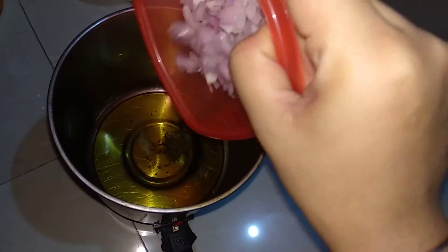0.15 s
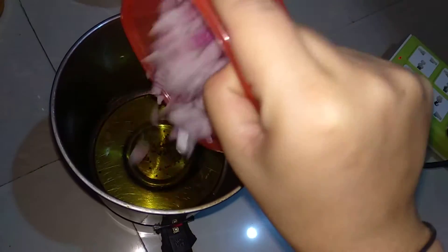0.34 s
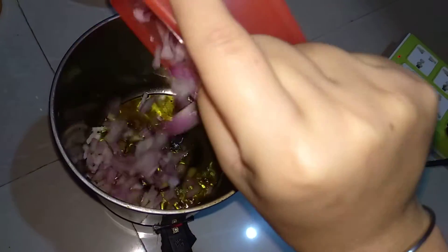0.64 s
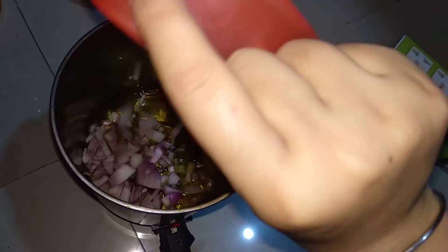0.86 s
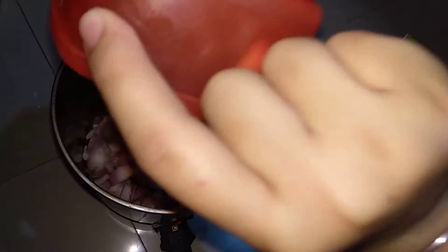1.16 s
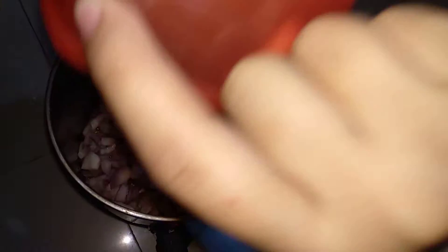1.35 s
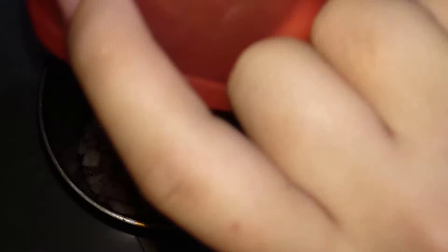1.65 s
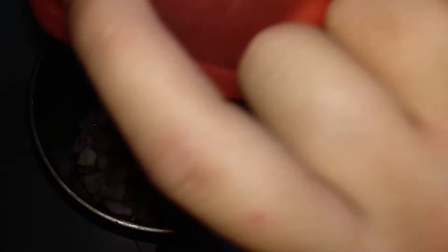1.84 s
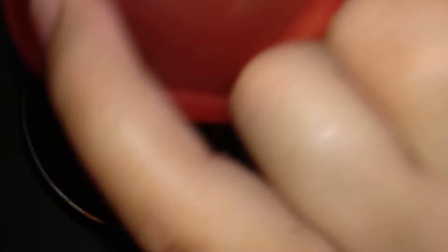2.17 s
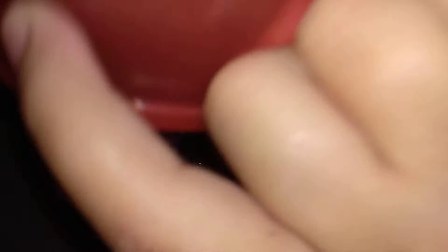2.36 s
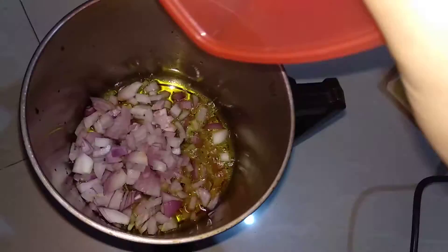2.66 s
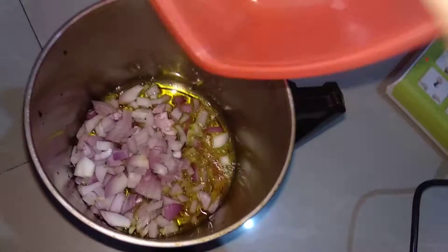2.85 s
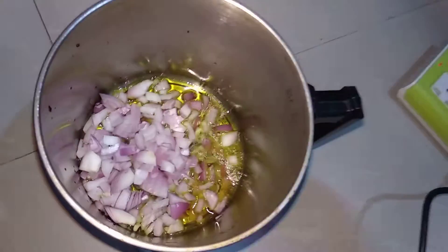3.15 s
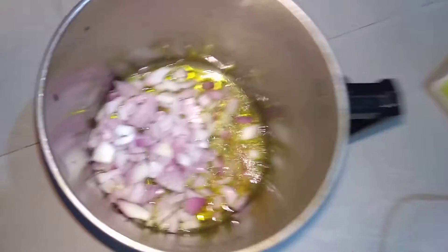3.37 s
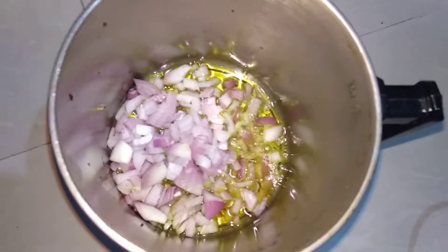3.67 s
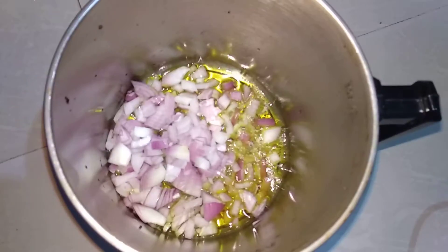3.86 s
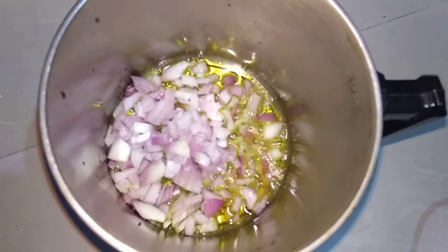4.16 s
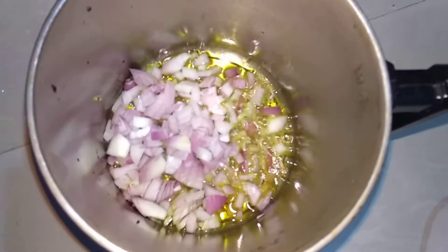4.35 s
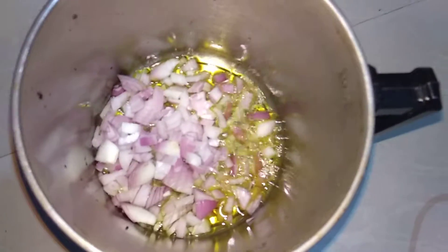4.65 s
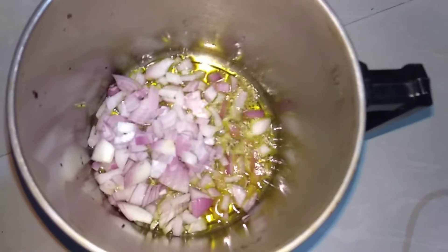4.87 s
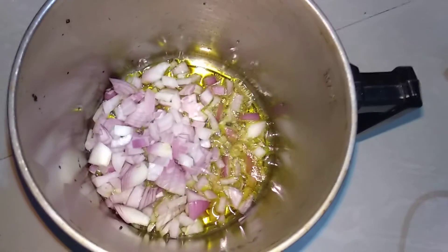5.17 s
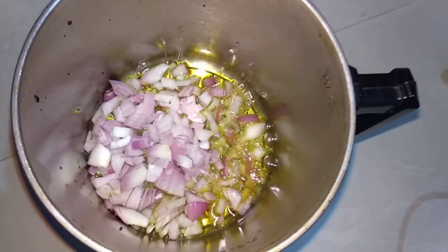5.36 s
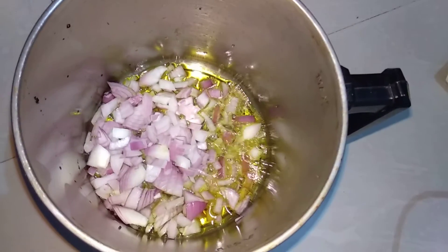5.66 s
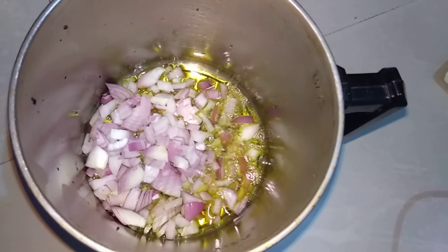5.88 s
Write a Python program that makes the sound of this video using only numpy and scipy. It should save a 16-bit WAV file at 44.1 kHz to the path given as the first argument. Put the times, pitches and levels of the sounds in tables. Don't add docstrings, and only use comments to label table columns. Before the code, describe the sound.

Handheld close-up in a small kitchen: faint rumble and a couple of pops and bowl taps, then chopped onions splash into hot oil with a fierce hiss. The frying eases but continues, crisp and crackly, with slight hollow gurgling from the pot. Scattered pops spit out, a plastic bowl is put down in a double knock, and a piercing snap follows soon after.

```python
import sys
import numpy as np
from scipy import signal
from scipy.fft import rfft, irfft, next_fast_len
from scipy.io import wavfile
from scipy.ndimage import uniform_filter1d, minimum_filter1d, map_coordinates

SR = 44100
rng = np.random.default_rng(int(sys.argv[2]) if len(sys.argv) > 2 else 0)


def int16_out(signal):
    q = np.round(np.clip(np.atleast_2d(signal).T, -1, 1) * 32767)
    wavfile.write(sys.argv[1], SR, q.astype(np.int16))


def nominal_scale(level):
    x = np.asarray(level, float) / 20
    return 10 ** x


N = 265261


def unit(x):
    return x / np.sqrt(np.mean(x ** 2) + 1e-20)


def along(points, hz):
    f, v = np.transpose(points)
    return np.interp(np.log(hz + 1), np.log(f + 1), v)


def curves(rows):
    s, *cols = np.transpose(rows)
    return [np.interp(np.arange(N) / SR, s, c) for c in cols]


def wobble(rate):
    return map_coordinates(rng.standard_normal(N // 256), [np.arange(N) * rate / SR])


def filtered(x, response):
    m = next_fast_len(x.shape[-1] + 8192)
    spectrum = rfft(x, m) * response(np.fft.rfftfreq(m, 1 / SR))
    return irfft(spectrum, m)[..., :x.shape[-1]]


def ears(pan_db):
    return nominal_scale(np.array([pan_db / 2, -pan_db / 2]))


def late(f, seconds):
    return np.exp(-2j * np.pi * f * seconds)


def scatter(t60, size=4096):
    tail = rng.standard_normal((2, size)) * nominal_scale(-60 * np.arange(size) / SR / t60)
    return tail / np.linalg.norm(tail, axis=1)[:, None]


def add(track, sound, s):
    part = track[:, round(s * SR):][:, :sound.shape[1]]
    part += sound[:, :part.shape[1]]


def patchy(x, gain):
    hz, _, z = signal.stft(x, SR, nperseg=1024)
    field = rng.standard_normal(z.shape[1:])
    field = uniform_filter1d(field, 4, 0)
    field = uniform_filter1d(field, 5, 1)
    return signal.istft(z * gain(hz[:, None], unit(field)), SR, nperseg=1024)[1][:, :N]


def hum(hz, wander):
    return np.sqrt(2) * np.sin(2 * np.pi * np.cumsum(hz * (1 + wander * wobble(7))) / SR)


# loudest_s, length_s, firing_hz, level_db
ENGINES = [(0.156, 0.27, 64.8, -56), (1.102, 0.21, 25, -62), (2.245, 0.68, 66.8, -60),
           (3.62, 1.21, 27.17, -54.5), (3.5, 0.57, 45.2, -58), (4.339, 0.19, 70.1, -56),
           (5.153, 0.56, 37.84, -57), (5.905, 0.53, 64, -62), (0.08, 0.22, 164.4, -69),
           (2.0, 0.35, 192, -78), (3.399, 0.22, 108.6, -64), (4.697, 0.59, 112.3, -67.5),
           (5.652, 0.21, 108, -65)]


def engines():
    glide_per_s, octave_db, octave_under_hz = 0.055, -8, 45
    t, out = np.arange(N) / SR, 0
    for s, length, hz, db in ENGINES:
        phase = 2 * np.pi * np.cumsum(hz * (1 + glide_per_s * (t - s) + 0.0207 * wobble(5))) / SR
        swell = np.exp(-(2 * (t - s) / length) ** 4)
        octave = (hz < octave_under_hz) * nominal_scale(octave_db) * np.sin(2 * phase)
        out = out + nominal_scale(db + 0.5 + 1.9 * wobble(5.9)) * swell * (np.sin(phase) + octave)
    return out


# freq_hz, correlation
LIKENESS = [(60, 0.95), (150, 0.92), (380, 0.85), (950, 0.095), (2380, -0.79), (5980, -0.13), (15000, 0.1)]


def rush(spectrum):
    turn = lambda f: np.arccos(np.clip(along(LIKENESS, f), -1, 1)) / 2
    shape = lambda f: nominal_scale(along(spectrum, f)) * [np.cos(turn(f)), np.sin(turn(f))]
    mid, side = filtered(rng.standard_normal((2, N)), shape)
    return unit(np.array([mid + side, mid - side]))


# freq_hz, density_db
KITCHEN = [(53, 1.5), (90, -0.5), (199, -13), (261, -5), (326, -21.5), (388, -17.5), (500, -19.5),
           (568, -13.5), (655, -18), (1340, -21), (1620, -19), (1780, -22.5), (2190, -23), (2560, -44),
           (4000, -41), (5200, -73), (8800, -120)]
# freq_hz, density_db
HANDLING = [(8.8, -54), (15, -14), (32, -0.5), (61, 1), (91, -13), (118, -3), (160, -13), (210, -53),
            (350, -120)]
# time_s, gain_db
KITCHEN_SWELL = [(0, 0.5), (0.5, 0), (0.9, -3), (1.8, -4), (2.2, 2), (3.1, -1), (3.8, 3), (4.6, 0.5), (6.01, 1)]


def background():
    tremor_db, rumble_db, kitchen_db = -68, -68, -73.5
    hiss = nominal_scale(-76) * filtered(rng.standard_normal((2, N)), lambda f: 1 / (1 + (f / 16100) ** 60))
    gusts, drift = 4 * wobble(5), .8 * wobble(5)
    low = nominal_scale(tremor_db + gusts) * hum(hz=25, wander=0.093)
    low = low + nominal_scale(rumble_db - 5.5 + 2.7 * wobble(2.0)) * hum(hz=65.5, wander=0.081)
    low = low + nominal_scale(np.linspace(-82, -72, N) + 0.99 * wobble(1.97)) * hum(hz=112.5, wander=0.042)
    handling = nominal_scale(rumble_db - 1.5) * rush(HANDLING)
    kitchen = nominal_scale(kitchen_db + 9.0 + drift + curves(KITCHEN_SWELL)[0]) * rush(KITCHEN)
    return low + engines() + handling + kitchen + hiss


# time_s, level_db
MOTOR = [(0, -80.5), (0.55, -77.5), (0.8, -87.5), (1.5, -81.5), (1.8, -74.5), (2.3, -81.5), (2.6, -81.5),
         (4.0, -82), (4.3, -99), (6.01, -94)]


def motor():
    hz, width_hz = 398, 53
    band = lambda f: (1j * f * width_hz / (hz ** 2 - f * f + 1j * f * width_hz)) ** 2
    return nominal_scale(curves(MOTOR)[0]) * unit(filtered(rng.standard_normal(N), band))


# freq_hz, width_hz, level_db
POT = [(575, 50, 0), (1770, 130, -1), (2520, 350, -4)]


def pot_air(f, modes=POT):
    out = 0
    for k, (c, w, db) in enumerate(modes):
        out = out + (-1) ** k * nominal_scale(db) * 1j * f * w / (c * c - f * f + 1j * f * w)
    return out


def paths(f, shift=0):
    left = .4 * late(f, .00016) + .9 * late(f, .00046 + shift) + .3 * late(f, .0019 + 3 * shift)
    right = 1 + .3 * late(f, .0015 + 3 * shift)
    return np.array([left, right])


def bubbles(rate, spread_db, clump_db):
    chance, size, sign = rng.random(N), rng.exponential(size=N), rng.standard_normal(N)
    size = np.minimum(size, 5)
    level = nominal_scale(spread_db * size + clump_db * wobble(40))
    return unit((chance < rate / SR) * np.sign(sign) * level)


def gurgle(modes, level_db, pan_db):
    kicks = bubbles(rate=1200, spread_db=-0.5, clump_db=1.5)
    coarse = unit(filtered(kicks, lambda f: pot_air(f, modes))) * nominal_scale(level_db)
    near = filtered(coarse, lambda f: np.array([late(f, 0.00033), 1 + 0 * f]))
    far = signal.fftconvolve(coarse[None], scatter(0.12), axes=1)[:, :N]
    return ears(pan_db)[:, None] * (0.89 * near + 0.27 * far)


# time_s, vigour_db, coarse_db re vigour, left_minus_right_db
FRY = [(0.0, -83, -15, -4), (0.3, -81.5, -12, -5), (0.462, -70.5, -9, -10), (0.476, -56.5, -7, -3),
       (0.526, -49, -22, -5.5), (0.79, -54, -20, 1), (0.9, -57, -28, -2.5), (1.06, -58.5, -12.5, -2),
       (1.28, -56, -17.5, -3), (1.4, -60, -15.5, -3.5), (1.8, -61, -27, -6.5), (2.7, -59.5, -28, -6),
       (3.4, -58, -24, -3), (3.9, -57.5, -20.5, -4), (4.22, -55, -19.5, -2.5), (4.5, -57, -21.5, -3),
       (5.12, -58, -19.5, -3.5), (6.01, -56, -17, -3)]
# time_s, level_db re vigour
HANDFULS = [
    (0.53, 0),
    (0.575, -1),
    (0.63, 0.5),
    (0.68, -0.5),
    (0.715, 6),
    (0.755, 2),
    (0.79, 2),
    (0.835, 1),
    (0.9, 0.5),
]
# bubble_hz, flicker_db
SPOTS = [(4170, 2), (6150, 2.5), (8320, 1.2), (9400, 0.5), (11500, 1.5), (14600, 3), (10500, 1.2)]
# freq_hz, density_db
FIZZ = [(940, -13), (1600, -16), (1750, -3), (2210, -14), (2610, -6), (4080, -8.5), (5210, -4.5),
        (6460, -5), (7200, -4), (10600, 1), (15400, -5.5), (16000, -19), (16500, -55)]
# freq_hz, level_db
FIZZ_LEFT = [(600, -11), (2500, -0.5), (5000, 2.5), (9000, -2), (15000, -10.5)]


def frying():
    crackle_db, patch_db = -7.5, 1.8
    lowest_db, lowest_follows = -74.5, 0.64
    tumble_s, tumble_db, tumble_fade_s = 0.44, 12.5, 0.2
    fizz_db, coarse_db, pan_db = curves(FRY)
    fizz_db = fizz_db + curves(HANDFULS)[0]
    fizz = 0
    for hz, flicker_db in SPOTS:
        flicker = nominal_scale(flicker_db * (wobble(14) / 2 + wobble(55)))
        fine = flicker * bubbles(rate=2500, spread_db=3.5, clump_db=3.0)
        shift, tail = rng.uniform(-.0003, .0002), scatter(.05)
        grid_hz, echo = np.linspace(0, SR / 2, 4097), rfft(tail, 8192)
        size = lambda f: 0.47 + 1 / (1 + ((f - hz) / (0.28 * hz)) ** 2)
        spread = lambda f: np.array([np.interp(f, grid_hz, e) for e in echo])
        heard = lambda f: size(f) * (.62 * paths(f, shift) + .8 * spread(f))
        fizz = fizz + filtered(nominal_scale(fizz_db) * fine, heard)
    crackle = bubbles(rate=170, spread_db=5.5, clump_db=-2.0)
    fizz = fizz + filtered(nominal_scale(fizz_db + crackle_db) * crackle, paths)

    colour = lambda f: nominal_scale(along(FIZZ, f)) * nominal_scale([along(FIZZ_LEFT, f), 0 * f])
    norm = np.sqrt(np.mean(nominal_scale(along(FIZZ, np.linspace(1, SR / 2, 999))) ** 2))
    fizz = patchy(filtered(fizz, colour), lambda hz, field: unit(nominal_scale(patch_db * field))) / norm
    fizz = nominal_scale(-4.0) * ears(pan_db) * fizz

    low_db = lowest_db + lowest_follows * (fizz_db - np.median(fizz_db)) + 2 * wobble(9)
    since = np.arange(N) / SR - tumble_s
    low_db = low_db + tumble_db * (since > 0) * np.exp(-np.abs(since) / tumble_fade_s)
    upper = gurgle(POT[1:], fizz_db + coarse_db + 4.5 + 1.2 * wobble(8), -7.5)
    return fizz + upper + gurgle(POT[:1], low_db, -0.51)


# start_s, peak_db, pitch_hz, left_minus_right_db
TAPS = [(0.1166, -56, 3430, -8), (0.299, -59.5, 3590, -10), (0.2999, -71, 2400, -6), (1.524, -58, 3140, -8),
        (2.136, -54.5, 4140, -1), (0.378, -68, 1140, -13), (0.357, -64, 905, -5), (0.392, -70, 1510, -2.5),
        (0.44, -77, 890, -6), (0.375, -56.5, 440, 5), (0.515, -49, 550, -8), (0.618, -63, 570, -2),
        (4.815, -58.5, 776, 5), (5.7, -57.5, 750, 2), (0.875, -58, 1880, 14), (1.017, -60, 1850, 1),
        (1.061, -60, 1820, 0), (1.0706, -47.5, 1170, -2), (1.118, -57, 1210, -6), (1.136, -55, 563, -2),
        (1.144, -56, 1750, 9), (1.184, -57.5, 1170, 1), (1.248, -55, 2500, -14), (1.347, -62.5, 1140, 3),
        (3.963, -53.5, 2940, -16), (4.245, -52, 2730, -2)]


def taps():
    out, t = np.zeros((2, N)), np.arange(4096) / SR
    for s, db, hz, pan_db in TAPS:
        hollow = 1000 < hz < 1300
        t60, air_db = (.085, -17) if hollow else (0.058, -4)
        band = lambda f: 1j * f * hz * .6 / (hz * hz - f * f + 1j * f * hz * 0.83)
        rough = filtered(scatter(t60 * 2), lambda f: band(f) ** 3)
        kick = filtered(scatter(t60 * 0.15), lambda f: band(f) * pot_air(f))
        ring = np.sin(2 * np.pi * hz * t) * nominal_scale(-60 * t / (t60 / 2))
        mix = ring + .35 * rough / rough.max() + nominal_scale(air_db) * kick / kick.max()
        onset = 1 - np.exp(-t * hz / 0.12)
        add(out, nominal_scale(db + 1.0) * ears(pan_db)[:, None] * mix * onset, s + 0.00065)
    return out


# start_s, peak_db (right), bubble_hz, life_cycles, air_db re peak
POPS = [(0.1171, -21, 11900, 0.57, -40), (0.3005, -24, 11700, 2.1, -38), (1.2479, -22.5, 7400, 0.72, -37),
        (1.4042, -22, 12700, 1, -24.5), (1.7336, -21.5, 9700, 1.9, -45), (1.7719, -23, 10300, 1.2, -42),
        (1.8142, -21, 11400, 0.68, -23), (2.1374, -9.5, 12900, 1.34, -29.5), (2.8751, -29, 3300, 0.29, -19),
        (3.0926, -16, 13280, 0.97, -43), (3.153, -19.5, 11300, 2.1, -46), (3.5576, -22, 8900, 1.9, -28),
        (4.1571, 1.5, 9360, 1.45, -32.5), (4.2644, -23.5, 9300, 0.5, -41), (4.4967, -28.5, 5500, 2.4, -31),
        (4.7019, -14, 9700, 2.1, -28), (5.0277, -12, 10200, 2, -33), (5.0939, -20.5, 10300, 2.2, -31),
        (5.1629, -19.5, 9400, 2.3, -47), (5.2334, -22, 10700, 3, -37), (5.8992, -13.5, 9300, 2.5, -46.5)]
# start_s, peak_db, bubble_hz, air_db re peak
SPLASHES = [(0.4831, -29.5, 10700, -13), (0.5953, -25.5, 11400, -27), (0.707, -27.5, 10500, -20),
            (0.722, -22, 5400, -33), (0.7777, -24, 10500, -37), (0.9926, -38, 7450, -22),
            (1.074, -44, 9300, -26), (1.2345, -28, 9250, -32), (1.5244, -20.5, 7800, -43),
            (1.6189, -33.5, 8950, -22), (2.0815, -34.5, 8700, -28), (3.5466, -32, 12100, -22),
            (3.6185, -38, 9500, -28), (3.7951, -27, 9250, -12), (3.8795, -29, 6500, -1.5),
            (4.1195, -45, 11800, -5), (4.1522, -19, 8900, -33), (4.2964, -41, 11500, -18),
            (4.9128, -36, 9700, -24), (5.0895, -46, 10500, -31), (5.353, -31.5, 9500, -32)]
# start_s, peak_db, bubble_hz
TICKS = [(0.46, -28, 11300), (0.51, -21, 11000), (0.531, -43, 9500), (0.539, -35, 10000),
         (0.553, -27, 10000), (0.606, -27, 9550), (0.608, -28.5, 5300), (0.617, -22, 10000),
         (0.635, -35, 10500), (0.8202, -22, 11500), (0.876, -26, 10400), (0.939, -24.5, 12700),
         (1.206, -29, 11000), (1.319, -33, 11300), (1.516, -26, 11000), (1.3533, -33, 11400),
         (1.912, -25.5, 9350), (2.2726, -24, 10300), (2.36, -44, 10600), (2.502, -27, 11300),
         (2.578, -28, 9000), (2.71, -27.5, 9000), (2.7102, -28, 12900), (2.9264, -28, 11100),
         (4.5456, -25.5, 12800), (5.042, -29, 11600), (5.2041, -32, 12700), (5.3593, -25, 9450),
         (5.452, -27, 11800), (5.5442, -25.5, 8800), (1.4965, -37, 8800), (1.74, -26, 7950),
         (2.432, -47.5, 4500), (2.593, -27, 9050), (2.642, -30, 12000), (2.675, -42.5, 4600),
         (2.962, -30, 11500), (3.009, -39, 6000), (3.79, -42, 5130), (5.807, -38, 10500),
         (5.834, -37, 11500), (5.889, -32, 9500), (5.941, -32.5, 13000), (5.983, -33, 10500),
         (0.851, -30, 10500), (0.899, -28, 11000), (0.786, -26, 10500), (1.5253, -27, 5200),
         (1.452, -40, 7500), (1.899, -31, 11000), (2.13, -32, 10000), (2.316, -44, 4200),
         (0.636, -30, 5630), (0.677, -37, 4240), (0.763, -32, 5400)]


def bursts():
    pour_s, still_db, poured_db = .45, -19.5, -26
    out = []
    for s, db, hz, cycles, air_db in POPS:
        out.append((s, db, hz, air_db, cycles, still_db if s < pour_s else poured_db))
    for s, db, hz, air_db in SPLASHES:
        out.append((s, db, hz, air_db, 2 * (hz / 10 ** 4) ** 2, -12))
    for s, db, hz in TICKS:
        out.append((s, db, hz, -31.5, 1.7 * max(1, 8000 / hz), -28.5))
    return out


def pops():
    out, t = np.zeros((2, N)), np.arange(4096) / SR
    kick = filtered(1.0 * (t == 0), lambda f: pot_air(f, POT[1:]) + 1.18 * pot_air(f, POT[:1]))
    kick = kick / np.abs(kick).max() * [[.6], [1]]
    shadow = lambda f: paths(f) * nominal_scale([along(FIZZ_LEFT, f) - 6.5, 0 * f])
    landing = 1 - np.exp(-t / .004)
    for s, db, hz, air_db, cycles, spatter_db in bursts():
        u = t * hz / (.6 * cycles)
        snap = np.sin(2 * np.pi * hz * t) * (u * np.exp(1 - u) + 0.014 * np.exp(-u / 4))
        drops = scatter(.14) * nominal_scale(3 * rng.standard_normal(len(t) // 64).repeat(64))
        size = lambda f: 0.41 + 1.02 / (1 + ((f - 1.1 * hz) / (0.34 * hz)) ** 2)
        colour = lambda f: nominal_scale(0.97 * along(FIZZ, f)) * size(f)
        spray = landing * filtered(drops + 5.14 * scatter(0.012), colour) * [[.6], [1]]
        burst = filtered(snap, shadow) + nominal_scale(spatter_db + 24) * spray + nominal_scale(air_db - 3) * kick
        add(out, nominal_scale(db - 2.5) * burst, s)
    return out


# start_s, peak_db, pitch_hz, left_minus_right_db, t60_s
KNOCKS = [(0.1468, -39.5, 880, -9.5, 0.012), (0.1625, -44.5, 920, -15, 0.012),
          (0.1626, -50, 2500, -14, 0.0077), (0.2218, -47, 815, -9, 0.013), (0.222, -59, 1790, -9, 0.036),
          (0.222, -59, 2300, -12, 0.012), (0.225, -57.5, 560, -11, 0.075),
          (0.7077, -30, 2470, -12.5, 0.018), (0.7077, -40.5, 1850, -8, 0.065),
          (0.7073, -45, 3180, -6, 0.011), (0.7095, -35.5, 2150, -9, 0.02), (0.74, -46, 2520, 3, 0.034),
          (0.477, -54.5, 2150, -4, 0.071), (0.841, -56, 1040, -5, 0.015), (2.8744, -53.5, 1763, -9, 0.064),
          (2.8742, -54, 590, -2.5, 0.074), (2.8742, -47.5, 3570, -10, 0.017),
          (2.8735, -50, 2660, -10, 0.02), (3.0997, -50, 2400, 1.5, 0.0096), (3.0995, -58, 1770, -4, 0.027),
          (3.796, -50, 2630, 0, 0.0069), (3.7952, -57, 1840, 3, 0.0097), (3.009, -56, 1340, -6, 0.01),
          (3.009, -52, 2600, -10, 0.0069), (2.1365, -51, 2540, -8, 0.02)]


def knocks():
    edge_cycles, tail_db, tail_s = 0.39, -5.5, 0.13
    out, t = np.zeros((2, N)), np.arange(4096) / SR
    for s, db, hz, pan_db, t60 in KNOCKS:
        onset = 1 - np.exp(-t * hz / edge_cycles)
        ring = np.sin(2 * np.pi * hz * t) * nominal_scale(-60 * t / t60) * onset
        tail = signal.fftconvolve(ring[None], scatter(tail_s), axes=1)[:, :len(t)]
        add(out, nominal_scale(db) * ears(pan_db)[:, None] * (ring + nominal_scale(tail_db) * tail), s)
    return out


# start_s, peak_db, left_minus_right_db, tilt_db per octave, thud_hz
BUMPS = [
    (3.704, -24, 9.5, 0.9, 1400),
    (3.8796, -22.5, -3, 1.5, 800),
]
# freq_hz, level_db, t60_s
EDGE_FIRST = [(462, -9, 0.048), (790, -6, .03), (1180, -6.5, 0.027), (1545, -1, 0.023), (1820, 2, 0.02),
              (2520, -0.5, 0.017), (2710, -8, .025), (3600, -18, 0.017), (4140, -14, .02),
              (4750, -22, 0.016)]
# freq_hz, level_db, t60_s
FLAT_DOWN = [(405, -14, 0.063), (480, -13, 0.046), (778, -5.5, 0.048), (1150, -9, .03), (1398, -4.5, 0.057),
             (1770, -4, .028), (2715, -7.5, .025), (2785, -12, 0.033), (3170, -21, 0.026),
             (4000, -24, 0.018)]


def bowl():
    longest_s = 0.075
    out, t = np.zeros((2, N)), np.arange(4096) / SR
    for (s, db, pan_db, tilt_db, thud_hz), modes in zip(BUMPS, (EDGE_FIRST, FLAT_DOWN)):
        ring = 0
        for hz, level, t60 in modes:
            mode_db = level + tilt_db * np.log2(hz / 1200) + 7 - 60 * t / min(t60, longest_s)
            ring = ring + nominal_scale(mode_db) * np.sin(2 * np.pi * hz * t)
        crack = filtered(scatter(0.032)[0], lambda f: 4 / (1 + (f / 4500) ** 4))
        dull = lambda f: 1j * f * thud_hz / (thud_hz ** 2 - f * f + 1j * f * thud_hz * 0.6)
        thud = filtered(scatter(0.066)[0], dull)
        ring = (ring + 6.6 * thud) * (1 - np.exp(-t / 0.0017)) + 2.9 * crack
        struck = 0.92 * ring + 9 * thud + 4 * crack
        echo = signal.fftconvolve(struck[None], scatter(0.18, size=8192), axes=1)
        add(out, nominal_scale(db - 14.0) * ears(pan_db)[:, None] * np.array([ring, np.roll(ring, 12)]), s)
        add(out, nominal_scale(db - 22.5) * echo, s + .004)
    return out


def scene():
    return frying() + pops() + taps() + bowl() + background() + motor() + knocks()


def spared(dry, low_hz, high_hz, over_db):
    band = filtered(dry.sum(0), lambda f: (f > low_hz) & (f < high_hz))
    power = np.abs(uniform_filter1d(band ** 2, 128))
    return minimum_filter1d(1. * (power < nominal_scale(2 * over_db) * np.median(power)), round(.05 * SR))


# freq_hz, chance_threshold
THINNED = [(2300, -3.2), (3300, -1.7), (4400, -1.6), (5300, -2), (6600, -1.75), (7400, -2), (8600, -3),
           (12000, -3), (13500, -2.3), (16000, -2.1)]
THINNED_DB = -32


def dropped(x, strain):
    bins, frames = 11, 4
    hz, _, z = signal.stft(x, SR, nperseg=2048, noverlap=1536)
    rows, cols = z.shape[1:]
    field = rng.standard_normal((rows, cols))[::bins, ::frames]
    field = field.repeat(bins, 0).repeat(frames, 1)[:rows, :cols]
    lost = field < along(THINNED, hz[:, None]) + .55 + strain[:cols]
    return signal.istft(z * nominal_scale(THINNED_DB * lost), SR, nperseg=2048, noverlap=1536)[1][:, :N]


def top_cut(x):
    return signal.sosfilt(signal.butter(12, 16980, fs=SR, output="sos"), x)


def record(dry):
    fade = np.exp(-1 / (.09 * SR))
    strain = signal.lfilter([1 - fade], [1, -fade], 1 - spared(dry, 5000, 16000, 9))
    strain = np.pad(strain, (0, 4096))[::512]
    thinned = patchy(dry, lambda hz, field: nominal_scale(THINNED_DB * (field < along(THINNED, hz))))
    thinned = dropped(thinned, strain)
    calm = spared(dry, 700, 5000, 9) * spared(dry, 5000, 16000, 15)
    calm = uniform_filter1d(calm, 256)
    return top_cut(calm * thinned + (1 - calm) * dry)


dry = scene()
out = record(dry)
int16_out(out)
```